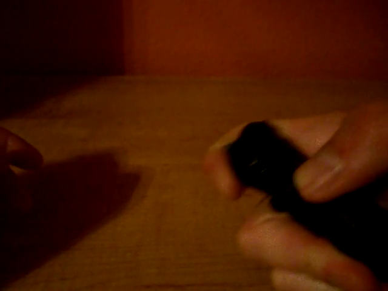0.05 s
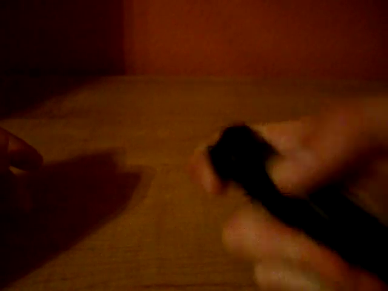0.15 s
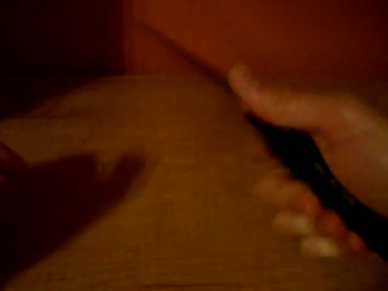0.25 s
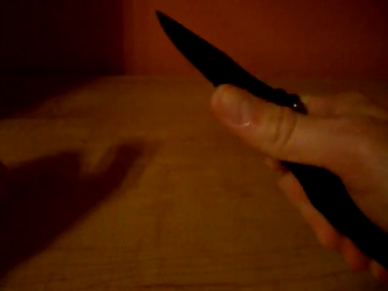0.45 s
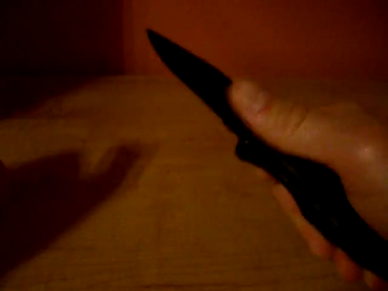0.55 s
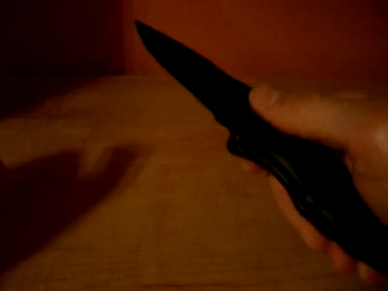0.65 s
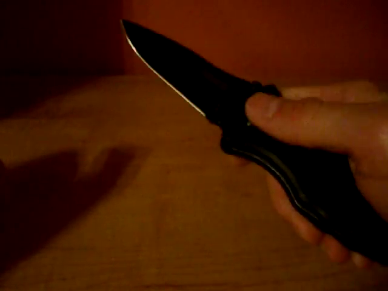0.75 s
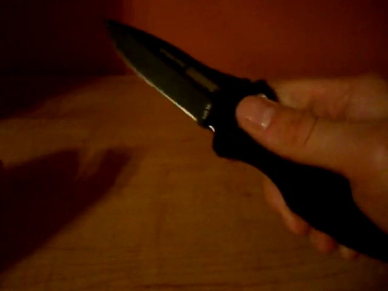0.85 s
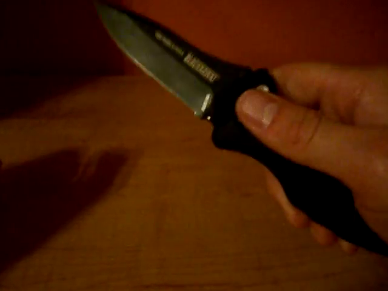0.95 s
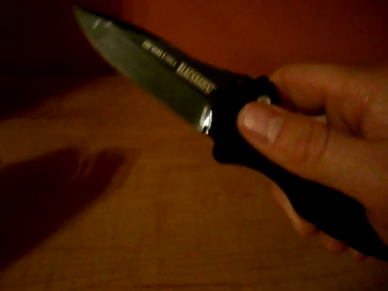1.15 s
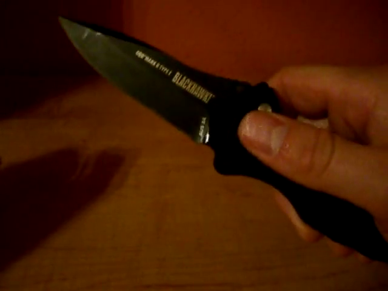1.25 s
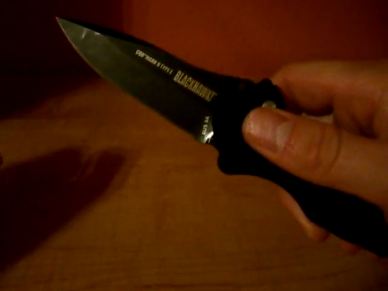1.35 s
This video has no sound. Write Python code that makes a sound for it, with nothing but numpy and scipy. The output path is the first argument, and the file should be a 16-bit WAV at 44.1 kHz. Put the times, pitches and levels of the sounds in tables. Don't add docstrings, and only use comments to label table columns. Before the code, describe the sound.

A folding knife flicks open, gritty scrape then a loud sharp steel snap into its lock

```python
import sys
import numpy as np
from scipy import signal
from scipy.fft import rfft, irfft
from scipy.io import wavfile
from scipy.ndimage import uniform_filter1d

SR = 44100
rng = np.random.default_rng(int(sys.argv[2]) if len(sys.argv) > 2 else 0)


def materialize(psi):
    bounded = np.clip(np.atleast_2d(psi).T, -1, 1)
    quanta = np.round(bounded * 32767).astype(np.int16)
    wavfile.write(sys.argv[1], SR, quanta)


def boost(x):
    u = np.asarray(x, float) / 20
    return 10 ** u


N = 61739
T = np.arange(N) / SR
SNAP_S = 0.3043

# pitch_hz, width_hz, level_db
WHISTLES = [(13800, 40, -74), (9000, 250, -76), (10540, 80, -80), (11800, 60, -81)]
# pitch_hz, level_db (per Hz)
HISS_COLOUR = [(12, -37), (20, 8), (356, -15.5), (421, -12.5), (644, -21.5), (1460, -23.5), (9940, -37),
               (15600, -39.5), (17000, -41)]
# pitch_hz, level_db
ROOM_COLOUR = [(1000, -21.5), (2800, -15), (3400, 0), (3880, -1), (4250, -16.5), (5500, -4.5),
               (10500, -0.5), (13000, -13), (16500, -34)]
# pitch_hz, fall_s
ROOM_FALL = [(1500, 0.53), (3500, .65), (6500, 0.56), (10000, .5), (14000, 0.27)]
# start_s, length_s, level_db
FINGER_RUBS = [
    (-.03, 0.11, -55.5),
    (0.091, 0.15, -54),
    (0.63, 0.015, -58),
    (0.663, 0.039, -51.5),
    (0.769, 0.037, -56.5),
    (0.814, 0.051, -60.5),
]
# pitch_hz, level_db
SKIN_COLOUR = [(880, -49), (1500, 0), (1660, -18), (2970, -32), (3380, -6.5), (9100, -0.5), (16000, -20.5)]
# middle_s, length_s, level_db
HAND_BUMPS = [
    (.15, 0.026, -44),
    (.244, 0.01, -30),
    (.733, 0.025, -33),
    (.816, 0.049, -41.5),
    (.27, 0.044, -38.5),
    (.292, .012, -35.5),
]
# start_s, level_db, pitch_hz, ring_s (to fall by 30 dB)
STEEL_BLOWS = [(.180, -41, 2990, 0.0078), (0.181, -42, 4000, 0.0071), (.197, -35, 7200, .012),
               (.2062, -24, 7350, 0.0091), (0.21, -16.5, 7550, 0.0072), (.283, -38, 9250, 0.031),
               (0.3012, -15.5, 4600, 0.0023), (.3013, -33, 9600, .002), (.30265, 2, 13000, 0.00095),
               (0.3026, -2, 6200, 0.0015), (0.3034, -7, 16300, .001), (0.3038, -11, 3080, 0.0015),
               (.3035, -4.5, 4740, .002), (.30378, 0.5, 9130, 0.0022), (.3038, -6, 14650, 0.0013),
               (.30385, 2, 4285, 0.0011), (.3040, -1, 2060, 0.0018), (0.3029, -4, 7870, 0.0066),
               (0.3103, -18, 8200, 0.005), (0.313, -25, 10500, 0.0058), (.3058, -18, 10200, 0.0054),
               (.2105, -46, 780, .025), (.2108, -19, 4600, 0.0036), (.2115, -35, 1500, 0.0097),
               (.236, -38, 770, 0.023), (.628, -48, 6800, 0.025), (.672, -51, 6800, 0.019)]
# pitch_hz, level_db, ring_s (to fall by 60 dB)
STEEL_RINGS = [(3470, -36.5, 0.51), (4550, -25, 0.013), (5553, -27, 0.05), (6940, -14, .03),
               (8500, -24, 0.094), (9040, -14, 0.027), (9730, -20, .035), (10500, -19, .03)]
# pitch_hz, level_db
RATTLE_COLOUR = [(880, -51), (1500, -32), (3700, -7), (4310, -27), (5230, -18), (9430, -21), (10200, 2),
                 (17000, -54)]
# time_s, level_db, handle_db (share of the low handle tone)
PIVOT_RUB = [
    (0.141, -60, -35),
    (0.196, -48.5, -1),
    (0.205, -22, -20.5),
    (0.2111, -20.5, 0),
    (0.2128, -24.5, 2),
    (.221, -36.5, 0.5),
    (0.232, -24.5, -6.5),
    (.262, -40.5, 0),
    (.3, -49.5, -4),
]
# pitch_hz, width_hz, level_db
BLADE_TONES = [(4600, 1200, -4.5), (6200, 1500, -6), (8720, 1330, -3.5), (10300, 1400, -1),
               (13000, 3100, -7.5), (14600, 2000, -10.5)]
# pitch_hz, width_hz, level_db
HANDLE_TONES = [(770, 80, -15), (1500, 110, -14), (2575, 400, -3), (3670, 590, -2.5)]


def evened(x):
    return x / np.sqrt(np.mean(x ** 2) + 1e-20)


def read(points, hz):
    f, value = np.transpose(points)
    return np.interp(np.log(hz + 1), np.log(f + 1), value)


def coloured(x, points):
    hz = np.fft.rfftfreq(x.shape[-1], 1 / SR)
    return irfft(rfft(x) * boost(read(points, hz)), x.shape[-1])


def resonate(x, hz, width):
    r = np.exp(-np.pi * width / SR)
    return 2 * signal.lfilter([1 - r], [1, -r * np.exp(2j * np.pi * hz / SR)], x).real


def bump(at, length):
    return np.sin(np.pi * np.clip((T - at) / length, 0, 1)) ** 2


def whine():
    frame_hz, frame_at_s, blink_s = 29.97, 0.9075, 0.0034
    from_frame = ((T - frame_at_s) * frame_hz + 0.5) % 1 - 0.5
    blink = np.exp(-0.5 * (from_frame / frame_hz / blink_s * 2) ** 2)
    line = boost(-67) * (1 - 0.7 * blink) * np.sin(2 * np.pi * 15734.3 * T)
    half_line = boost(-74.5) * np.sin(2 * np.pi * 7882.1 * T)
    burst = boost(-59) * blink * np.sin(2 * np.pi * 7942 * T)
    out = np.sqrt(2) * (line + half_line + burst)
    for hz, width, db in WHISTLES:
        out += boost(db) * evened(resonate(rng.standard_normal(N), hz, width))
    return out


def hiss():
    frames, hz = N // 256 + 5, np.fft.rfftfreq(1024, 1 / SR)
    a, b, patches = rng.standard_normal((frames, 513, 3)).T
    patches = uniform_filter1d(patches, 12, 0)
    patches = evened(uniform_filter1d(patches, 8, 1))
    z = (a + 1j * b) * boost(read(HISS_COLOUR, hz)[:, None] + 0.46 * patches)
    noise = signal.istft(z, nperseg=1024, noverlap=768)[1][:N]
    return boost(-46) * evened(noise)


def room():
    taps = np.zeros(SR)
    at = np.arange(200, SR - 10, 10) + rng.integers(0, 10, (SR - 201) // 10)
    taps[at] = rng.choice([-1., 1.], len(at))
    hz, t, z = signal.stft(taps, SR, nperseg=256)
    level_db = read(ROOM_COLOUR, hz)[:, None] - 60 * t / read(ROOM_FALL, hz)[:, None]
    tail = signal.istft(z * boost(level_db), SR, nperseg=256)[1]
    return tail / np.std(tail[:2000])


def fingers():
    unevenness = evened(uniform_filter1d(rng.standard_normal(N), 120))
    grain = rng.standard_normal(N) * boost(1.2 * unevenness)
    strength = np.zeros(N)
    for s, length, db in FINGER_RUBS:
        strength += boost(db) * bump(s - 0.42 * length, 1.94 * length)
    out = evened(coloured(grain, SKIN_COLOUR)) * strength
    for k, (s, length, db) in enumerate(HAND_BUMPS, 1):
        out += (-1) ** k * boost(db) * bump(s - length / 2, length)
    return out


def jolt():
    jolt_s, fall_s, pull_s, swing_s = 0.3042, 0.0057, 0.00088, 0.015
    u = np.maximum(T - jolt_s, 0)
    push = boost(-5.5) * (1 - np.exp(-u / 0.00015)) * np.exp(-u / fall_s)
    pull = boost(-13.5) * bump(jolt_s - 1.353 * pull_s, 1.355 * pull_s)
    swing = boost(-5) * u / swing_s * np.exp(-u / swing_s)
    return push - pull - swing


def rattle():
    u = np.maximum(T - SNAP_S, 0)
    chatter = rng.standard_normal(N) * (rng.random(N) < 0.3)
    fade = (1 - np.exp(-u / 0.000067)) * boost(-16 - 60 * u / 0.036)
    return evened(coloured(chatter, RATTLE_COLOUR)) * fade


def lock():
    out = np.zeros(N)
    for s, db, hz, ring_s in STEEL_BLOWS:
        u = np.maximum(T - s, 0)
        out += (1 - np.exp(-u / 0.00008)) * boost(db - 30 * u / ring_s) * np.sin(2 * np.pi * hz * u)
    u = np.maximum(T - SNAP_S, 0)
    rise = 1 - np.exp(-u / 0.000067)
    for (hz, db, ring_s), phase in zip(STEEL_RINGS, rng.random(len(STEEL_RINGS))):
        out += rise * boost(db - 60 * u / ring_s) * np.sin(2 * np.pi * (hz * u + phase))
    return out + rattle()


def body(grit, tones):
    out = np.zeros(N)
    for k, (hz, width, db) in enumerate(tones):
        out += (-1) ** k * boost(db) * resonate(grit, hz, width)
    return evened(out)


def scrape():
    slips_per_s, spread_db = 11000, 4.5
    s, db, handle_db = np.transpose(PIVOT_RUB)
    strength = boost(spread_db * np.minimum(rng.exponential(1, N), 2.5))
    slips = rng.random(N) < slips_per_s / SR
    grit = strength * rng.choice([-1., 1.], N) * slips
    handle = boost(np.interp(T, s, handle_db) - 3) * body(grit, HANDLE_TONES)
    return boost(np.interp(T, s, db, -120, -120)) * (body(grit, BLADE_TONES) + handle)


def scene():
    rub, tail = scrape(), room()
    snap = np.arange(N) == round(SNAP_S * SR)
    into_room = boost(-24.5) * snap + boost(-16.5) * rub / np.linalg.norm(tail)
    echoes = signal.fftconvolve(into_room, tail)[:N]
    notch_b, notch_a = signal.iirnotch(7780, 16, SR)
    heard = signal.lfilter(notch_b, notch_a, rub + lock() + echoes + fingers())
    return (heard + jolt() + hiss() + whine())[None]


def low_pass(x):
    return signal.sosfilt(signal.butter(12, 20000, fs=SR, output="sos"), x)


def record(dry):
    duck_s, duck_db, attack_s, hold_s, recover_s = 0.306, -12.5, 0.013, 0.11, 0.33
    down = np.clip((T - duck_s) / attack_s, 0, 1)
    back = np.clip(1 - (T - duck_s - hold_s) / recover_s, 0, 1)
    converter_noise = boost(-65.5) * rng.standard_normal(N)
    x = dry * boost(duck_db * down * back) + converter_noise
    top_cut = signal.firwin(255, 17250, window=("kaiser", 9), fs=SR)
    x = signal.oaconvolve(x, top_cut[None], "same")
    return low_pass(np.clip(x, -1, 1))


dry = scene()
out = record(dry)
materialize(out)
```